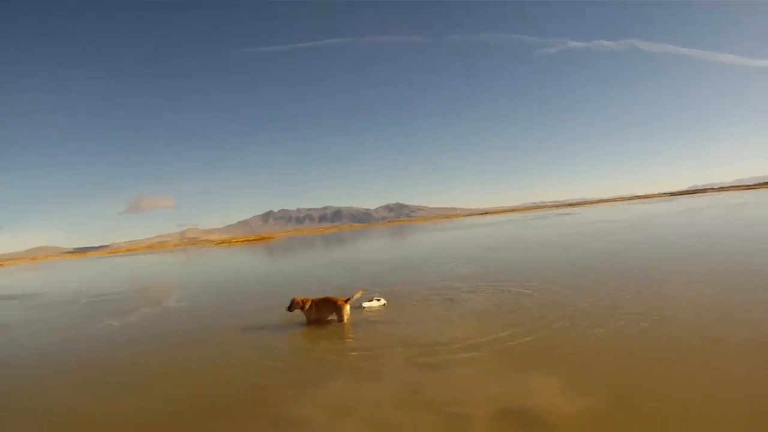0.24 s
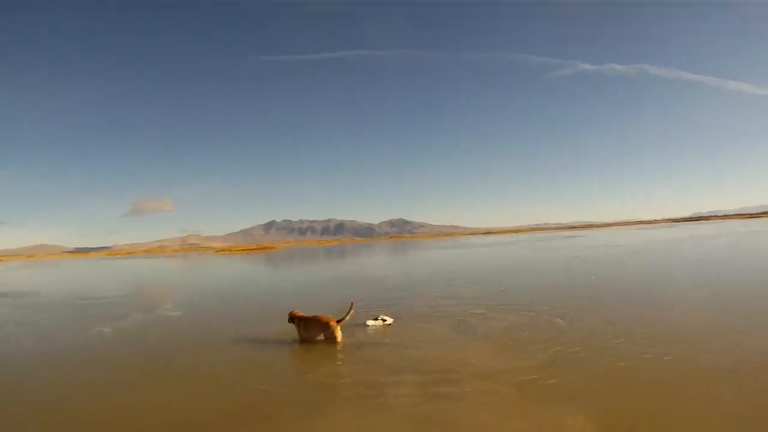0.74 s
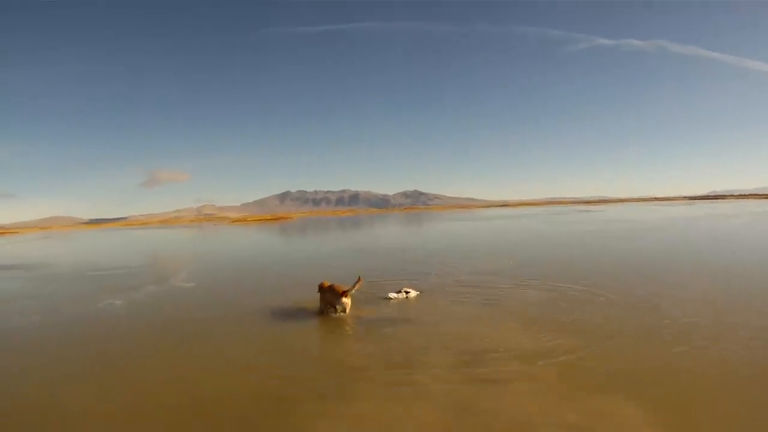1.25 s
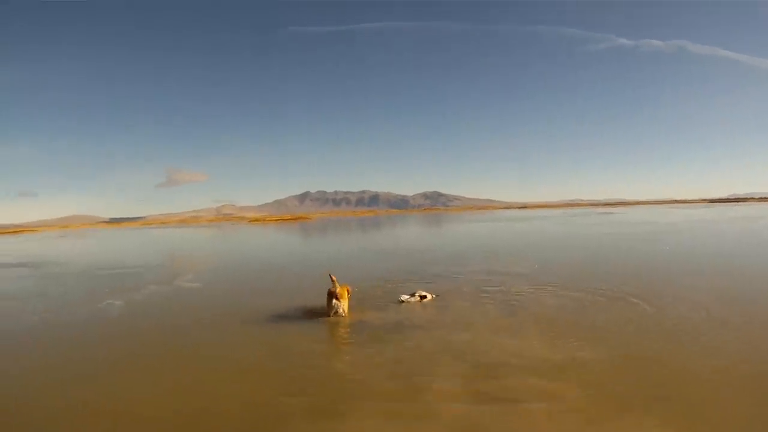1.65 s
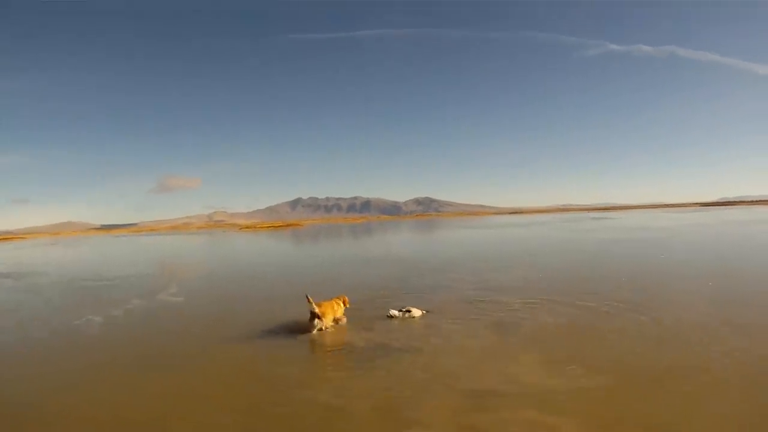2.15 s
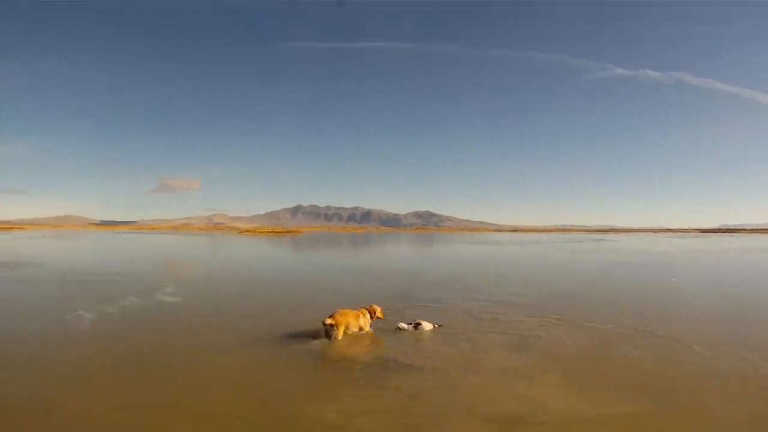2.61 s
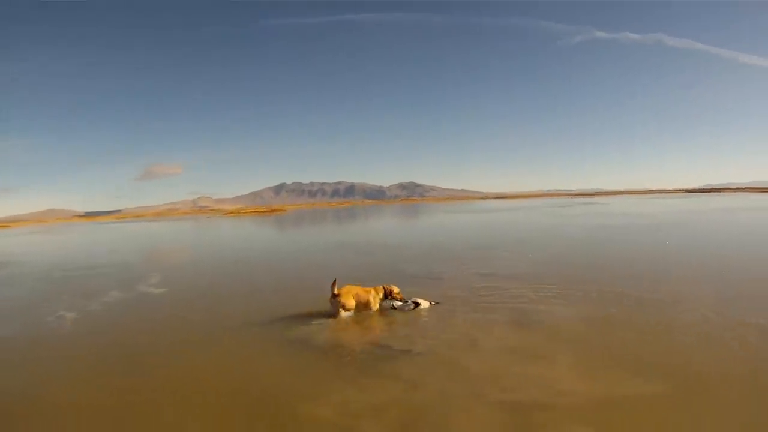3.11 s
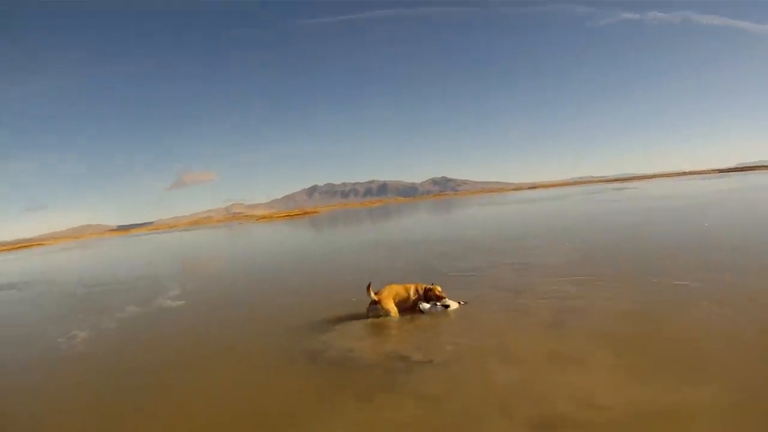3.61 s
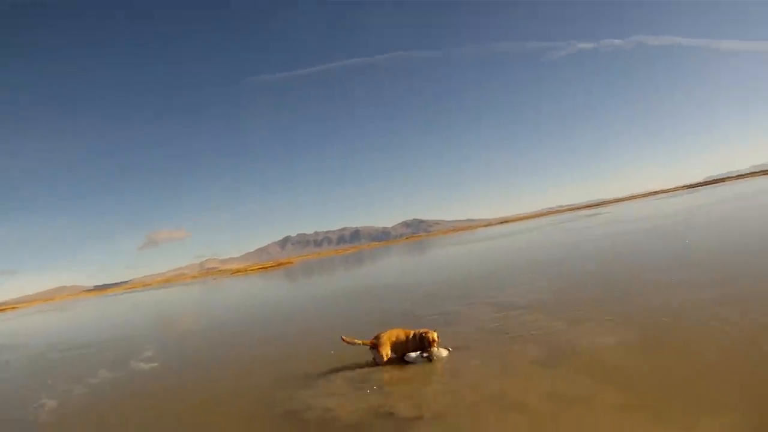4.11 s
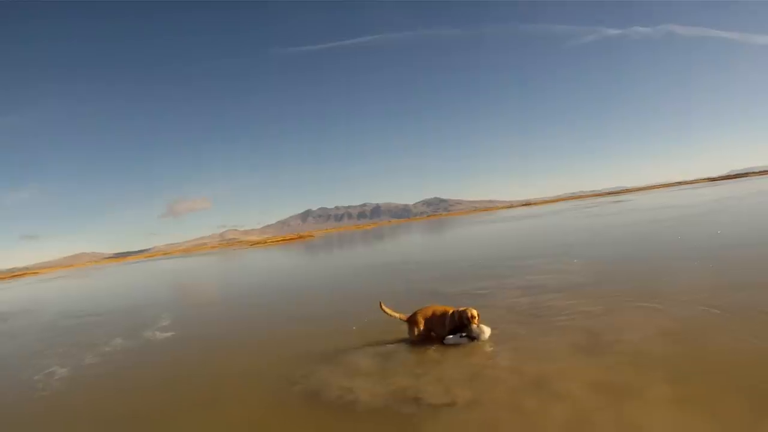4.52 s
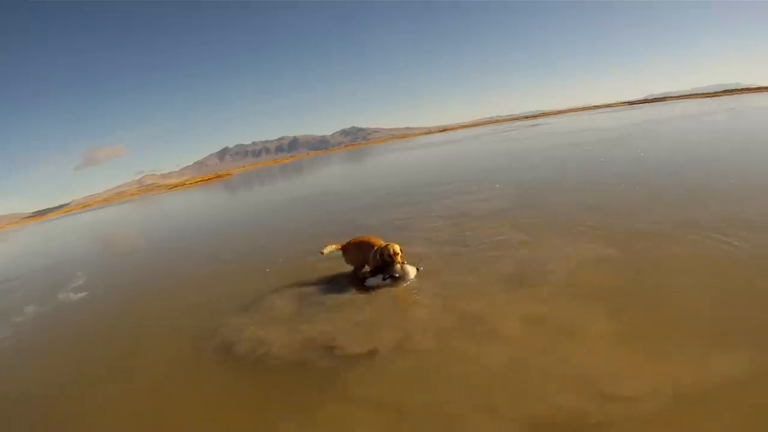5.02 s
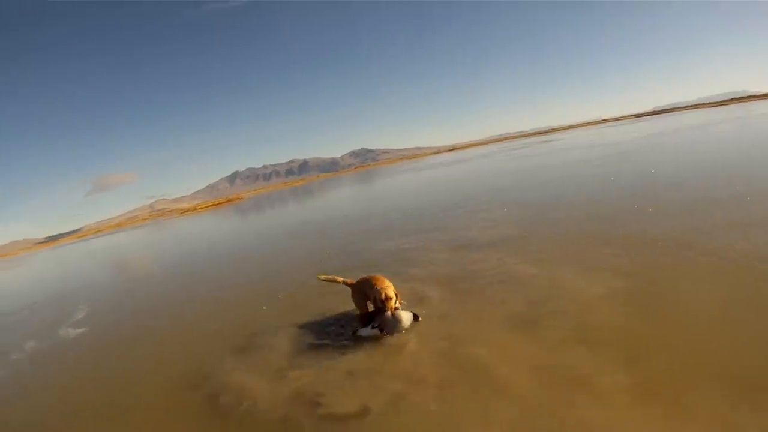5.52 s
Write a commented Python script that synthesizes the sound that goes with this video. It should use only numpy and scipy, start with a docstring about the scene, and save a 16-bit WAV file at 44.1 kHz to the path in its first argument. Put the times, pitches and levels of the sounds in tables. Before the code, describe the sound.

Outdoors on open, shallow water, with no echo. Soft, distant leg sloshes come in uneven strides with tiny rising drips, under steady hiss and gusty low rumble. Then sudden handling noise takes over: a thump, clattering plastic knocks, a scratchy drag, and a hard clipped snap. It fades into light ticks, grip rumble and faint water. The sealed small-camera microphone sounds boxy, coarse and gritty in the treble.

```python
"""A shallow, calm lake where a dog wades some way off, heard from inside the closed plastic case of a small camera.
Many small ringing bubbles and a wash of noise make the faint slosh; short rings and ticks make drips and creaks.
Low noise is the rumble of air and grip; then a hand knocks the case, rubs along it and snaps against it,
and each touch sets the case ringing at its own pitches. Hiss lies under everything.
The recorder samples slowly and holds each value, so the sound is mirrored into the treble."""
import sys
import numpy as np
from scipy import signal
from scipy.fft import rfft, irfft, next_fast_len
from scipy.io import wavfile

SR = 44100
rng = np.random.default_rng(int(sys.argv[2]) if len(sys.argv) > 2 else 0)


def put_to_file(sound):
    """Save the sound as 16-bit audio at rate SR, in the file named by the first command-line argument."""
    columns = np.atleast_2d(sound).T  # one column per channel
    safe = np.clip(columns, -1, 1)
    whole_steps = np.round(safe * 32767)
    wavfile.write(sys.argv[1], SR, whole_steps.astype(np.int16))


N = 253561


def from_db(db):
    """Turns a level in dB into a gain."""
    return 10 ** (np.asarray(db) / 20)


def rms_one(x):
    """Scales a signal to unit power."""
    return x / np.sqrt(np.mean(x ** 2) + 1e-20)


def in_time(rows):
    """Draws straight lines between the rows of a (time, values...) table: one value per sample for each column."""
    times, *columns = np.transpose(rows)
    return [np.interp(np.arange(N) / SR, times, column) for column in columns]


def coloured(x, spectrum):
    """Filters a sound by a spectrum given in relative dB per Hz, then scales it to unit power."""
    size = next_fast_len(N)
    hz = np.maximum(np.arange(size // 2 + 1) * SR / size, 1)
    points = np.array(spectrum)
    shape_db = np.interp(np.log(hz), np.log(points[:, 0]), points[:, 1], left=-90, right=-90)
    filtered = irfft(rfft(x, size) * from_db(shape_db), size)
    return rms_one(filtered[:N])


def drift(rate_hz):
    """Random wandering with spread 1: noise smoothed twice, faster for a higher rate."""
    r = np.exp(-2 * np.pi * rate_hz / SR)
    noise = rng.standard_normal(N + SR)
    settled = signal.lfilter([1], [1, -2 * r, r * r], noise)[SR:]
    return rms_one(settled)


def ring(clicks, hz, width_hz):
    """A resonance: a unit click starts a dying sine of height 1, which dies faster for a larger width."""
    r = np.exp(-np.pi * width_hz / SR)
    w = 2 * np.pi * hz / SR
    return signal.lfilter([0, np.sin(w)], [1, -2 * r * np.cos(w), r * r], clicks + 1e-18)


def grains(per_s, spread_db):
    """Clicks at random moments, of uneven size and either sign, scaled to unit power."""
    sizes = from_db(spread_db * np.minimum(rng.exponential(1, N), 4))
    signs = rng.choice([-1, 1], N)
    happens = rng.random(N) < per_s / SR
    return rms_one(sizes * signs * happens)


def swells(start, end, rise_db_per_s, fall_db_per_s):
    """For each event: progress 0-1 from start to end, and the dB lost before the start and after the end."""
    t, start, end = np.arange(N) / SR, start[:, None], end[:, None]
    progress = np.clip((t - start) / np.maximum(end - start, 1e-3), 0, 1)
    lost_db = rise_db_per_s * np.maximum(start - t, 0) + fall_db_per_s * np.maximum(t - end, 0)
    return progress, lost_db


# strides through the water: (start [s], crest [s], slosh level at the crest before the treble lift [dB])
STRIDES = [(-0.2, 0.335, -60), (0.7, 1.054, -59), (1.305, 1.8, -61.5), (1.983, 2.293, -63.5),
           (2.414, 2.69, -61.5), (2.9, 3.165, -65.5), (3.313, 3.546, -61.5), (4.9, 5.0, -64),
           (5.162, 5.4, -62.5)]
# tone of the sloshing water: (frequency [Hz], relative level [dB per Hz])
SLOSH_SPECTRUM = [(290, -39.5), (500, -16), (864, -8), (1240, -1.5), (1480, -9), (1670, -11), (2020, -3),
                  (2310, -6), (2530, -11), (2860, -9.5), (3210, -14), (3590, -12), (4420, -19), (5210, -13),
                  (5900, -16.5), (7670, -52), (13000, -120)]
STRIDE_SWELL_DB, LAPPING_DB = 3.0, -67.5   # growth from start to crest; lowest level between strides
STRIDE_RISE_DB_PER_S, STRIDE_FALL_DB_PER_S = 300, 62
BRIGHT_START_DB, BRIGHT_CREST_DB = 0.5, 2.5   # spray brightens each stride as the leg is drawn through


def wading():
    """Many small bubbles ring a few cycles each, in clumps, over a wash of spray."""
    start, crest, crest_db = np.transpose(STRIDES)
    progress, lost_db = swells(start, crest, STRIDE_RISE_DB_PER_S, STRIDE_FALL_DB_PER_S)
    levels_db = crest_db[:, None] - STRIDE_SWELL_DB * (1 - progress) - lost_db
    slosh_db = np.maximum(levels_db.max(axis=0), LAPPING_DB)
    leading_progress = progress[levels_db.argmax(axis=0), np.arange(N)]   # of the loudest stride
    bright_db = BRIGHT_START_DB + (BRIGHT_CREST_DB - BRIGHT_START_DB) * leading_progress

    born = grains(1500 * from_db(6.2 * drift(6.2)), spread_db=3.0)   # the changing rate makes the clumps
    dealt = rng.integers(0, 20, N)   # which of the 20 pitches a bubble gets
    bubbles = np.zeros(N)
    for k, hz in enumerate(np.geomspace(500, 5500, 20)):
        clicks = born * (dealt == k) * from_db(3.0 * drift(3.3))
        bubbles += ring(clicks, hz, width_hz=hz / 17.0)
    bubbles = rms_one(np.diff(bubbles, prepend=0))
    wash = rng.standard_normal(N) * from_db(2.8 * drift(20))
    water = coloured(bubbles * from_db(-8.5) + wash, SLOSH_SPECTRUM)
    treble = signal.sosfilt(signal.butter(1, 2500, "high", fs=SR, output="sos"), water)
    return from_db(slosh_db) * (water + (from_db(bright_db) - 1) * treble)


# air pressing on the case: (time [s], level before gusts and low-pass [dB])
AIR = [(0.0, -53.5), (0.2, -46), (0.59, -64), (0.65, -52), (1.05, -49.5), (1.26, -70), (1.38, -49.5),
       (1.61, -62.5), (1.78, -42), (2.07, -67), (2.15, -52), (2.46, -61.5), (2.7, -53), (2.97, -64.5),
       (3.35, -51), (3.58, -54.5), (4.22, -38.5), (4.53, -37.5), (4.59, -45), (4.64, -33.5), (4.7, -41.5),
       (5.07, -50), (5.3, -37.5), (5.75, -53.5)]
# tone of the air before its low-pass: (frequency [Hz], relative level [dB per Hz])
AIR_SPECTRUM = [(7.1, -21), (12, -5), (32, -1.5), (49, -6.5), (63, -2.5), (68, -16), (80, -27.5),
                (110, -0.5), (140, -60), (240, -120)]
GUST_DB, GUSTS_PER_S = 3, 5.5   # spread and rate of the gusts


def air_rumble():
    """Lumpy air pressure on the case: deep noise whose level follows the table and wanders in gusts."""
    level_db = in_time(AIR)[0] + GUST_DB * drift(GUSTS_PER_S)
    deep = coloured(rng.standard_normal(N), AIR_SPECTRUM) * from_db(level_db)
    # keeps the rumble deep: takes away what the quick level changes spread upward
    return signal.sosfilt(signal.butter(6, 68, fs=SR, output="sos"), deep)


# tone of the hiss: (frequency [Hz], relative level [dB per Hz])
HISS_SPECTRUM = [(47, 6), (80, -9.5), (130, -10), (758, -17), (1260, -17.5), (1620, -20.5), (2000, -20.5),
                 (5200, -28), (5900, -36.5), (7670, -71.5), (13000, -120)]
HISS_DB = -61.5


def hiss():
    """Steady noise with a fixed tone."""
    return from_db(HISS_DB) * coloured(rng.standard_normal(N), HISS_SPECTRUM)


# single drips and plops; from 4.97 s, small creaks and ticks of the case:
# (time [s], ringing level before its fade [dB], starting pitch [Hz],
# tick level before its fade, resonance and 6 dB lift [dB])
DRIPS_AND_CREAKS = [(0.165, -54, 2000, -59), (0.305, -47, 1240, -65), (0.4464, -37, 2070, -51.5),
                    (0.6994, -45.5, 1210, -77), (0.903, -48, 1240, -56), (0.978, -37.5, 1260, -51),
                    (1.1958, -45, 2240, -59), (1.245, -45, 1270, -64), (1.3513, -48, 2130, -78),
                    (1.4651, -45, 1950, -73), (1.7729, -51, 2370, -77), (1.82, -52, 2260, -53.5),
                    (2.0023, -44, 1970, -76), (2.2003, -46, 2060, -62), (2.2703, -54, 1290, -77),
                    (2.4473, -50.5, 2080, -77), (2.5297, -49, 1240, -67), (2.633, -48, 1250, -71),
                    (2.683, -39.5, 2080, -56), (2.9615, -45.5, 2020, -56), (3.3874, -58, 1100, -60),
                    (3.465, -47, 1190, -62), (4.9726, -45, 2034, -60.5), (5.1847, -44.5, 1930, -64),
                    (5.2044, -53.5, 1050, -66), (5.3244, -48, 2070, -71.5), (5.3892, -43.5, 2780, -69),
                    (5.4694, -50.5, 2140, -66), (5.6447, -55.5, 1240, -62.5), (5.7218, -42.5, 2100, -53.5)]
FAINT_DRIP_DB, FAINT_TICK_DB, FAINT_DRIP_HZ = -55.5, -66, (900, 2320)   # 14 more drips fall at random
# cycles until the ringing has died to about a third; fewer for each dB of tick above the faint tick
RING_CYCLES, TICK_SHORTENS = 6.4, 0.21


def drips_and_creaks():
    """A tick and a short ringing that rises in pitch: a drip and its bubble, or a small creak of the case."""
    out, t = np.zeros(N + 2000), np.arange(2000) / SR
    low, high = FAINT_DRIP_HZ
    faint = []
    for when, pitch in rng.random(size=(14, 2)):
        faint.append((when * N / SR, FAINT_DRIP_DB, low * (high / low) ** pitch, FAINT_TICK_DB))
    for s, ringing_db, hz, tick_db in DRIPS_AND_CREAKS + faint:
        cycles = max(RING_CYCLES - TICK_SHORTENS * max(tick_db - FAINT_TICK_DB, 0), 2)
        fade = np.exp(-t * hz / cycles) * (1 - np.exp(-t / 0.00069))
        ringing = np.sin(2 * np.pi * hz * (t + 2.7 * t ** 2)) * fade
        burst = rng.standard_normal(len(t)) * np.exp(-t / 0.0019) * (1 - np.exp(-t / 0.001))
        tick = ring(burst, 3670, width_hz=1280)
        out[round(s * SR):][:len(t)] += from_db(ringing_db) * ringing + from_db(tick_db + 6.0) * tick
    return out[:N]


# the grip shifting: (time [s], rumble level [dB])
GRIP = [(3.5, -58.5), (3.9, -44.5), (4.105, -50), (4.15, -40.5), (4.245, -40.5), (4.3, -50), (4.45, -54),
        (4.518, -46.5), (4.65, -42), (4.8, -50.5), (4.928, -55), (5.438, -57.5), (5.638, -54.5)]
# tone of the grip: (frequency [Hz], relative level [dB per Hz])
GRIP_SPECTRUM = [(35, -46), (60, -3.5), (226, -19.5), (273, -28), (303, -21.5), (400, -32), (520, -42),
                 (880, -120)]
GRIP_RISE_DB_PER_S, GRIP_FALL_DB_PER_S, GRIP_HELD_DB = 200, 153, -61


def grip_rumble():
    """Uneven noise, higher than the air's, that swells and fades around each shift of the grip."""
    s, shift_db = np.transpose(GRIP)
    lost_db = swells(s, s, GRIP_RISE_DB_PER_S, GRIP_FALL_DB_PER_S)[1]
    grip_db = (shift_db[:, None] - lost_db).max(axis=0)
    held = slice(round(s[0] * SR), N)   # from the first shift on, the hand holding the case keeps a lowest rumble level
    grip_db[held] = np.maximum(grip_db[held], GRIP_HELD_DB)
    uneven = rng.standard_normal(N) * from_db(3.0 * drift(15))
    return coloured(uneven, GRIP_SPECTRUM) * from_db(grip_db)


# ways the case rings, its modes: (pitch [Hz], width [Hz], relative level when rubbed [dB],
# relative level when knocked [dB])
CASE = [(600, 990, -26.5, 5), (1250, 150, -4, -3), (1543, 120, -6.5, -16), (1790, 330, 2.5, -5),
        (2200, 410, 3.5, 0.5), (2800, 250, -12, -5), (3565, 240, -4.5, -4.5), (4800, 130, -27.5, -11),
        (5290, 190, -16, -8.5)]


def case(force, mode_db):
    """A force rings all modes of the case side by side, each at the level that mode_db gives it."""
    total = 0
    for k, mode in enumerate(CASE):
        hz, width_hz = mode[:2]
        total = total + (-1) ** k * ring(force * from_db(mode_db(mode)), hz, width_hz)
    return total


# knocks on the case: (time [s], peak level [dB], pitch favoured by the spot struck [Hz])
KNOCKS = [(3.529, -36.5, 3580), (3.6141, -5.5, 1570), (3.6201, -10.5, 1940), (3.689, -18, 2040),
          (3.749, -11, 2800), (3.7594, -10, 3630), (3.789, -14.5, 1880), (3.899, -15, 2170),
          (4.104, -31, 3570), (4.1555, -23, 2000), (4.1601, 2.5, 600), (4.1616, 16.5, 2200),
          (4.165, -9, 1300), (4.1767, -14.5, 1440), (4.187, -13.5, 1430), (4.1988, -6.5, 1595),
          (4.2007, -15, 1900), (4.2495, -34, 1950), (4.288, -37.5, 4800), (4.310, -44, 4800),
          (4.408, -46, 4800), (4.496, -47, 1000), (4.524, -36, 1890), (4.701, -36.5, 1250),
          (4.785, -61, 800), (5.220, -44.5, 2070), (5.240, -33, 3430), (5.297, -43, 3460)]
FALLOFF_DB = 10   # per octave away from the favoured pitch


def knocks():
    """Each knock is a short ragged contact that rings most the modes near the pitch of the spot struck."""
    out, t = np.zeros(N + 4000), np.arange(4000) / SR
    for s, peak_db, spot_hz in KNOCKS:
        ragged = 1 + 0.19 * rng.standard_normal(len(t))
        contact = np.exp(-t / 0.0001) * ragged
        rings = case(contact, lambda mode: mode[3] - FALLOFF_DB * abs(np.log2(mode[0] / spot_hz)))
        out[round(s * SR):][:len(t)] += from_db(peak_db) * rings / abs(rings).max()
    return out[:N]


# short strokes: (start [s], hold [s], rub level at the start [dB], sag over the hold [dB],
# brightness [dB per octave], body level against the rub [dB])
STROKES = [(3.545, 0.033, -60.5, 0, 5, -5), (3.627, 0.0042, -27, 15, 6.5, -6),
           (3.643, 0.02, -32, 11, -3, -9), (3.682, 0.027, -30, 10, 1.5, -22),
           (4.077, 0.087, -61.5, -23, 2, -13), (4.245, 0.022, -36, 9.5, -2.5, -7),
           (4.284, 0.024, -43, 7.5, -0.5, -8.5), (4.321, 0.084, -48.5, -1, 0, -14.5),
           (4.42, 0.067, -56, 0.5, 7, -13), (4.495, .004, -56, -1, 8.5, 6),
           (4.521, 0.014, -45.5, 0.5, 0.5, -4), (4.636, .065, -36, 16, -0.5, -7),
           (4.78, .01, -62, -3, 2, 1), (4.975, 0.016, -61.5, 5, 4, -17), (5.297, 0.018, -63, 0, 11, -14),
           (5.4, 0.029, -64, 7, 0, -10)]
# the one long drag of the hand along the case: (time [s], rub level [dB], body level [dB])
DRAG = [(3.72, -58.5, -46), (3.74, -23, -56), (3.762, -26.5, -36), (3.8, -25.5, -41.5), (3.838, -32, -49.5),
        (3.9, -19, -35.5), (3.93, -26, -36.5), (3.976, -29, -44), (4.0, -28, -40), (4.04, -33, -50.5),
        (4.062, -60, -62)]
STROKE_RISE_DB_PER_S, STROKE_FALL_DB_PER_S = 1300, 1499.5
DRAG_BRIGHT_DB, DRAG_NARROW_DB = 4, 2.5   # per octave
NARROW_DB, NARROW_PER_BRIGHT = 6.5, 0.51   # loss per octave away from 2000 Hz; dull strokes ring narrower
REST_FROM_S, REST_DB, REST_BODY_DB = 3.8, -73.5, -81   # the hand then lies on the case


def hand():
    """Controls of the rub: the strongest stroke leads, the drag takes over, the resting hand sets a lowest level."""
    start, hold, stroke_db, sag_db, stroke_bright_db, stroke_body_db = np.transpose(STROKES)
    progress, lost_db = swells(start, start + hold, STROKE_RISE_DB_PER_S, STROKE_FALL_DB_PER_S)
    levels_db = stroke_db[:, None] - sag_db[:, None] * progress - lost_db
    lead = levels_db.argmax(axis=0)
    rub_db = levels_db.max(axis=0)
    bright_db = stroke_bright_db[lead]
    body_db = rub_db + stroke_body_db[lead]
    narrow_db = NARROW_DB - NARROW_PER_BRIGHT * bright_db

    drag = slice(round(DRAG[0][0] * SR), round(DRAG[-1][0] * SR))
    drag_db, drag_body_db = in_time(DRAG)
    rub_db[drag], body_db[drag] = drag_db[drag], drag_body_db[drag]
    bright_db[drag], narrow_db[drag] = DRAG_BRIGHT_DB, DRAG_NARROW_DB

    rest = slice(round(REST_FROM_S * SR), N)
    rub_db[rest] = np.maximum(rub_db[rest], REST_DB)
    body_db[rest] = np.maximum(body_db[rest], REST_BODY_DB)
    return rub_db, bright_db, body_db, narrow_db


def rub():
    """Skin sticks and slips: dense uneven clicks drive the case, a duller part passes through the wall."""
    rub_db, bright_db, body_db, narrow_db = hand()
    slips = grains(5000, spread_db=2.0) * from_db(1.1 * drift(110))
    plain_level = np.std(case(slips, lambda mode: mode[2]))
    wander_db = {mode: 2.0 * drift(29) for mode in CASE}   # the moving fingers damp one mode, then another

    def rubbed_db(mode):
        """Level of one mode: brightness tilts it, narrowing lowers it away from 2000 Hz, the fingers vary it."""
        octaves = np.log2(mode[0] / 2000)
        return mode[2] + bright_db * octaves - narrow_db * abs(octaves) + wander_db[mode]

    rubbed = case(slips * from_db(rub_db) / plain_level, rubbed_db)
    dull_band = signal.butter(2, [90, 900], "band", fs=SR, output="sos")
    body = signal.sosfilt(dull_band, grains(3300, spread_db=4.0))
    return rubbed + from_db(body_db) * rms_one(body)


# thumps, where the wall flexes or the whole case rocks:
# (time [s], height before the fade, its sign the direction [1 = full scale], pitch [Hz], time to fall 60 dB [s])
THUMPS = [(3.614, 0.17, 39.7, 0.18), (3.6165, 0.091, 85, 0.0057), (3.621, -0.45, 118, 0.025),
          (3.7613, -0.14, 58, 0.037), (3.788, -0.13, 71, 0.045), (3.9, 0.068, 137, 0.044),
          (4.1593, 0.17, 371, 0.029), (4.1602, -1.42, 101, 0.026), (4.244, 0.062, 45, 0.093),
          (4.494, .02, 109, .03), (4.525, .025, 91, 0.031), (4.635, 0.049, 61.7, 0.088),
          (4.786, .008, 120.4, 0.031)]


def thumps():
    """Each thump is one low sine that swings and dies away."""
    out, t = np.zeros(N + SR), np.arange(SR // 2) / SR
    for s, height, hz, t60 in THUMPS:
        fade = np.exp(-np.log(1000) * t / t60)
        out[round(s * SR):][:len(t)] += height * np.sin(2 * np.pi * hz * t) * fade
    return out[:N]


def scene():
    """All sources added together at one microphone, over the hiss."""
    background = wading() + air_rumble() + hiss() + drips_and_creaks()
    touch = grip_rumble() + knocks() + rub() + thumps()
    return (background + touch)[None]


OVERLOAD = 0.84   # samples are clipped at this height [1 = full scale]
CUTOFF_HZ = 15750


def record(dry):
    """Samples 12000 times a second, clips, holds each value for four steps of 48000 a second, cuts the top."""
    smooth = signal.sosfilt(signal.butter(4, 5500, fs=SR, output="sos"), dry[0])
    slow = signal.resample_poly(smooth, 40, 147)   # 44100 to 12000 a second
    slow = np.clip(slow, -OVERLOAD, OVERLOAD)
    held = np.repeat(slow, 4)   # the steps mirror the sound into the treble
    held = signal.resample_poly(held, 147, 160)[:N]   # 48000 to 44100 a second
    held = np.pad(held, (0, N - len(held)))
    top_cut = signal.cheby2(18, 65, CUTOFF_HZ, fs=SR, output="sos")
    return np.clip(signal.sosfilt(top_cut, held), -1, 1)[None]


dry = scene()
out = record(dry)
put_to_file(out)
```